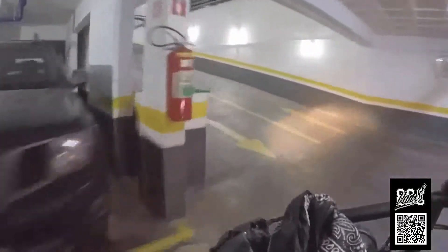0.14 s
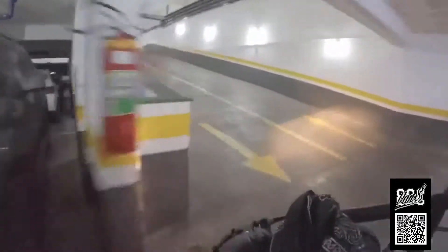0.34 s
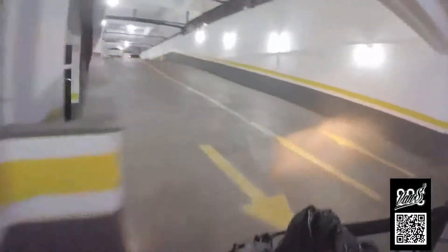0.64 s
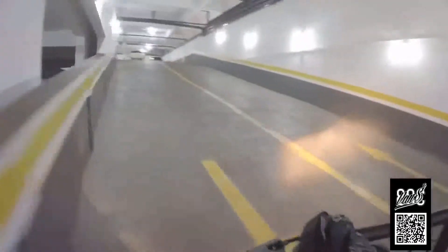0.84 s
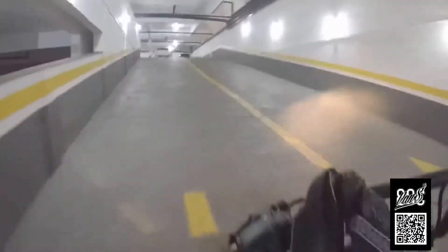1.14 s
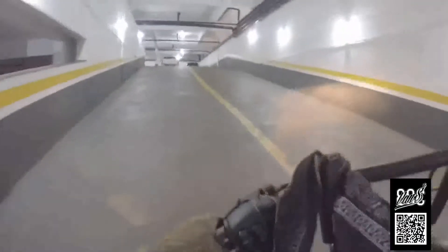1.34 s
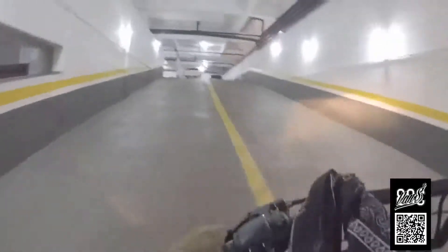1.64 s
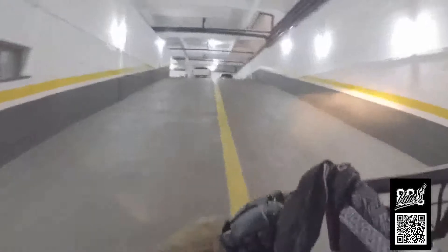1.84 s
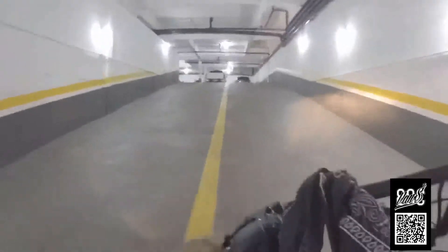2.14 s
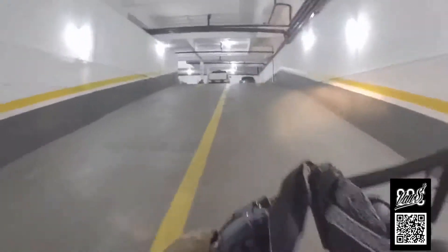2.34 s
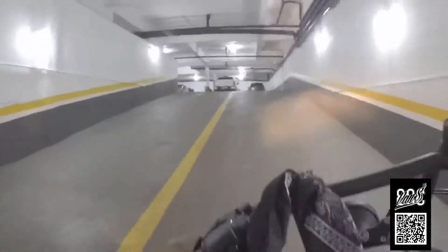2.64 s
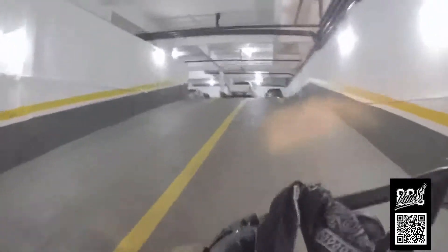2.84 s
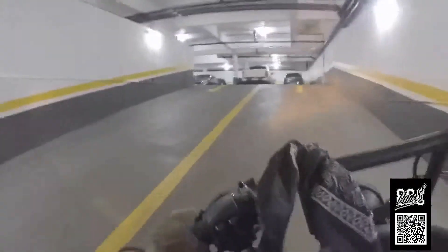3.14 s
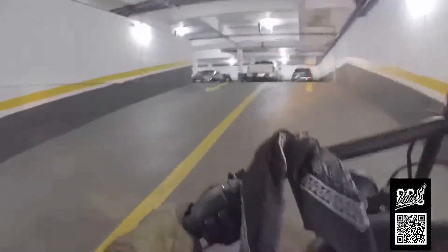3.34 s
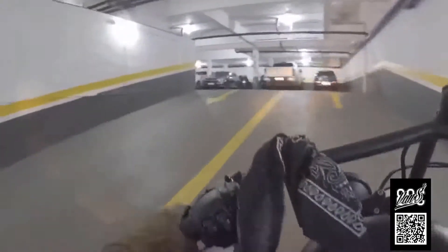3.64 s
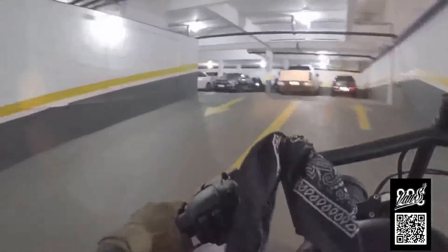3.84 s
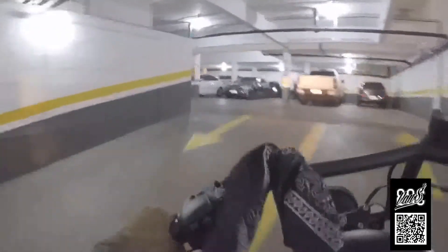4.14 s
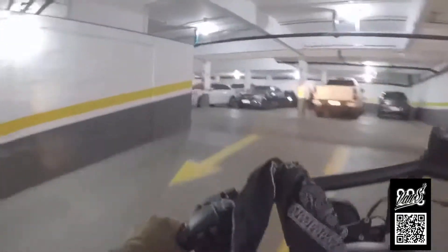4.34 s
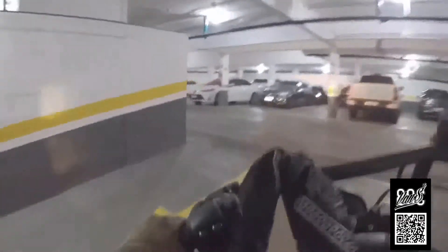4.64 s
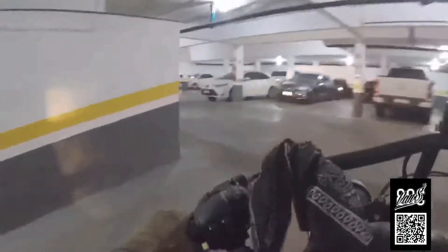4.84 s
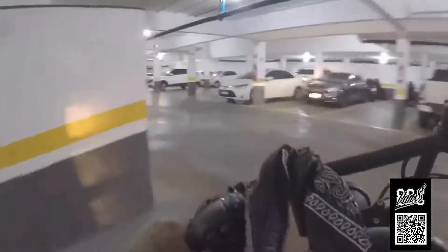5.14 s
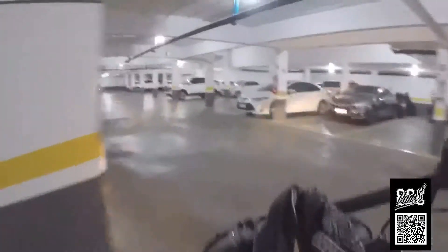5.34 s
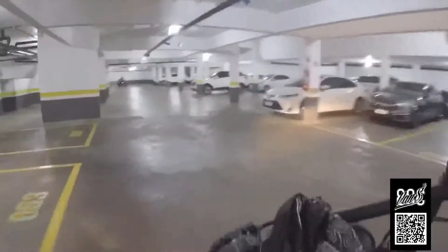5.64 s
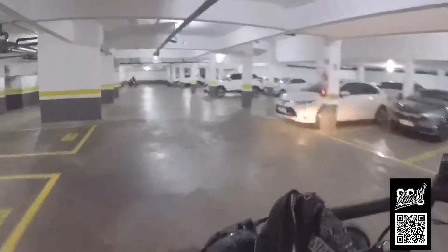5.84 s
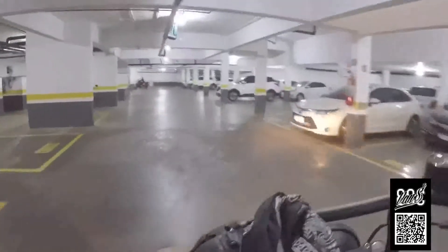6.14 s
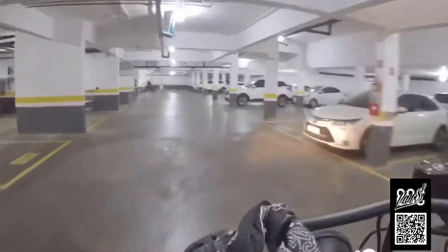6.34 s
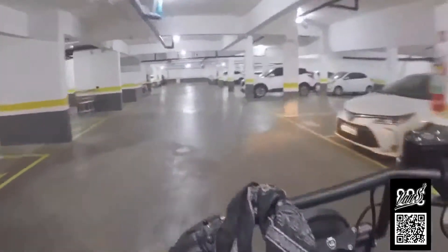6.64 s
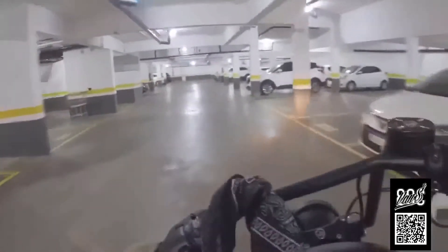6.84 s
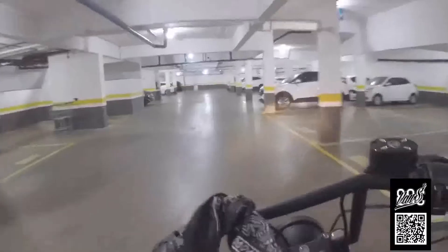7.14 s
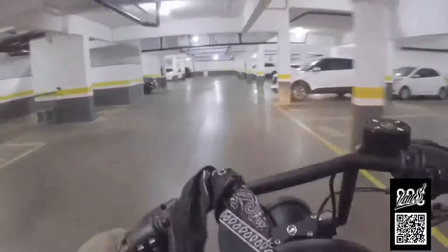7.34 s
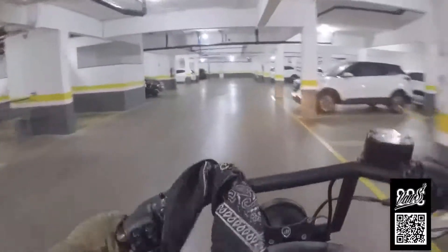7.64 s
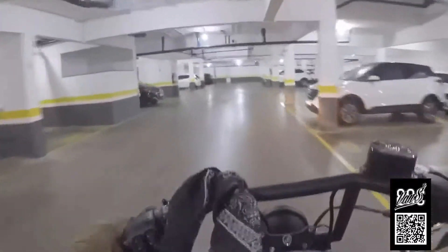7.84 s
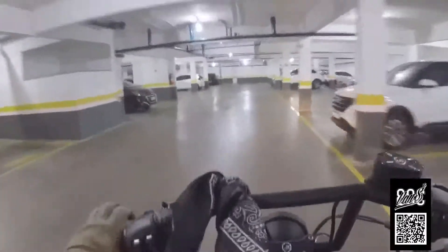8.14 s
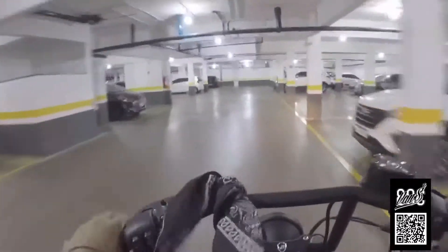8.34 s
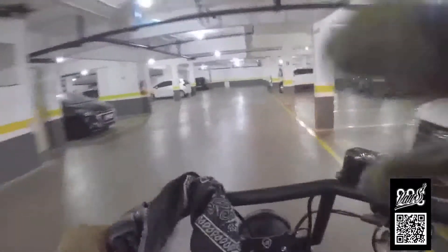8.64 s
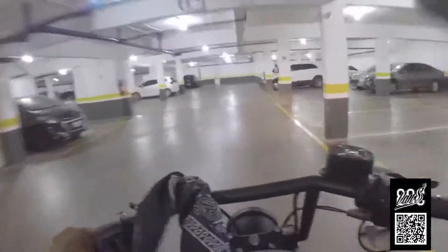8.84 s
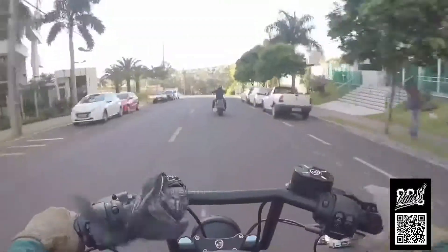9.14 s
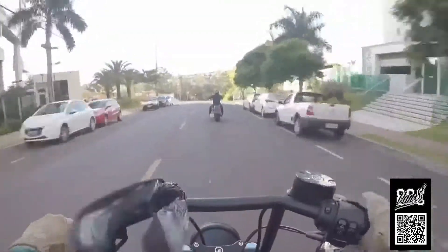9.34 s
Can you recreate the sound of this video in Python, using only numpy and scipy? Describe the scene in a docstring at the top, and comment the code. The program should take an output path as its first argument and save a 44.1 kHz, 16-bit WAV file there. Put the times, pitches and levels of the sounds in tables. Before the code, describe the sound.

A large V-twin motorcycle runs at low revs in a concrete underground garage, heard from the rider's seat. Its uneven, loping exhaust booms and barks with strong reverberation, over valve clatter and a light mechanical hiss. Around 1 second the revs sag and the engine thumps up a ramp, then pulls harder until about 3.6 seconds, ticking sharply around 2.5 to 3.5. The throttle eases from about 4 to 5.7 seconds, with a few hollow exhaust pops and faint metal squeaks. The revs dip lowest near 6 seconds, climb again through 7.5, and the throttle closes after 8. Scattered bright ticks and small knocks come from the bike throughout. Just before 9 seconds the sound fades out quickly and returns on an open street without echo: wind buffets the microphone over tyre rush, a lighter exhaust drone, a brief growl and a few small knocks, until about 9.5 seconds.

```python
"""V-twin motorcycle in a concrete garage

Heard from the rider's seat, the bike rolls up a ramp and through an underground garage. Uneven firing
pulses excite the exhaust resonances, which boom and bark; valve gear and drive tick and hiss, and the
hall reverberates. At nine seconds the sound fades out and returns on an open street, where wind buffets
the microphone over the rush of tyres and the drone of the exhaust."""
import sys
import numpy as np
from scipy import signal
from scipy.fft import rfft, irfft, next_fast_len
from scipy.io import wavfile
from scipy.ndimage import uniform_filter1d, minimum_filter1d

SR = 44100
rng = np.random.default_rng(int(sys.argv[2]) if len(sys.argv) > 2 else 0)


def dump(signal):
    """Clip the signal to [-1, 1] and save it as 16-bit WAV at the path in sys.argv[1]."""
    limited = np.clip(np.atleast_2d(signal).T, -1, 1)
    pcm = np.round(limited * 32767).astype(np.int16)
    wavfile.write(sys.argv[1], SR, pcm)


N = 418509

# Engine speed, in four-stroke cycles per second: t/s, f/Hz
CYCLE_RATE = [(0, 14.667), (0.45, 14.383), (0.9, 12.582), (1.2, 13.184), (1.45, 11.645), (1.95, 12.242),
              (2.4, 13.366), (3.0, 14.706), (3.6, 15.594), (3.9, 14.71), (4.25, 15.702), (4.65, 15.989),
              (5.35, 15.367), (5.75, 13.005), (6.15, 10.759), (6.5, 12.214), (6.95, 14.352), (7.5, 16.353),
              (8.2, 16.438), (8.6, 15.714), (8.95, 16.442), (9.2, 14.85)]
# Engine load relative to full load: t/s, level/dB
ENGINE_LOAD = [(0, -4.5), (0.6, -7), (1.55, -1.5), (2.5, -2.5), (3.55, -0.5), (4.3, -7), (5.7, -7.5),
               (6.6, -2.5), (7.5, -3.5), (8.15, -8.5), (8.45, -6.5), (8.85, -15), (8.95, -17)]
# Overall fader: t/s, gain
FADER_GAIN = [(0, 1), (8.86, 1), (8.97, .15), (8.978, 0), (9.018, 0), (9.026, 1)]
# Left microphone port relative to the right: f/Hz, level/dB
PORT_BALANCE = [(60, 4.5), (110, 3.5), (200, 2.5), (370, 1.5), (670, 2), (1240, -4.5), (2260, -2.5),
                (4140, -0.5), (7000, 2), (10000, -0.5), (14000, 0.5)]
# Correlation of the ports for equally strong centre and side signals: f/Hz, coefficient
PORT_CORRELATION = [(60, 0.99), (130, 0.82), (280, 1), (450, 0.79), (650, 0.41), (1000, -0.28),
                    (1400, 0.027), (2900, 0.39), (6400, 0.31), (12000, 0.59)]

# Spectral densities of the noisy layers: f/Hz, relative level/dB
DRAUGHT_SPECTRUM = [(12, -31), (26, 14), (40, 3), (60, -20), (120, -40)]
WIND_SPECTRUM = [(12, -25), (25, -32), (45, 3.5), (75, -2), (120, 1), (180, -5), (260, -12), (400, -25.5)]
TYRE_SPECTRUM = [(130, -47), (220, -1), (296, -3.5), (391, -2.5), (541, -8), (1110, -19), (1580, -27.5),
                 (2480, -25.5), (2900, -30.5), (9000, -54.5), (14000, -86)]
RASP_SPECTRUM = [(500, -12), (1100, 14), (1500, 3), (2300, 1), (3200, -14), (9000, -47)]
CLATTER_SPECTRUM = [(600, -33), (900, 0), (1100, -0.5), (1350, 2), (1600, -2), (2300, 0.5), (2600, -0.5),
                    (3400, 1), (4500, -1.5), (5600, -4), (8000, -25.5)]
HISS_SPECTRUM = [(3200, -42), (4600, -11.5), (5600, -6.5), (6300, -1.5), (7000, 0.5), (7700, -1),
                 (8400, -7), (10000, -11), (11300, -22.5), (13000, -22.5), (14500, -61)]
THUD_SPECTRUM = [(35, -29.5), (55, -13.5), (80, -2), (118, -1), (140, -1.5), (165, -3), (200, -2.5),
                 (240, -4), (310, -12.5), (380, -21.5), (600, -51)]
BARK_SPECTRUM = [(200, -47), (300, 3.5), (370, -5), (418, -1.5), (460, -5.5), (520, -4.5), (610, -7.5),
                 (700, -7.5), (850, -14), (1050, -28.5), (1600, -31.5)]
BRIGHT_TICK_SPECTRUM = [(1000, -37), (2500, -2), (7500, 21.0), (10000, 5.5), (14000, -9)]
TICK_SPECTRUM = [(800, -15.5), (1400, 4), (2400, -5), (3200, 2.0), (5000, -7.5), (8000, -3), (12000, -21)]

# Gusts in the garage and on the street (sigma is the Gaussian half length): t/s, sigma/s, rise/dB
DRAUGHT_GUSTS = [(1.85, 0.3, 5.8), (8.85, .18, 11)]
WIND_GUSTS = [(9.097, .01, 9.5), (9.164, 0.008, 8), (9.21, 0.014, 7), (9.238, .008, 5), (9.366, 0.0054, 8),
              (9.482, 0.014, 7)]
# Partials of the growl and of the exhaust in the open: harmonic number, relative level/dB
GROWL_HARMONICS = [(3, 0.5), (4, -7), (5, -11), (6, -20), (8, -17)]
DRONE_HARMONICS = [(5, -28), (7, -27), (9, -26)]

# Knocks of bike parts: t/s, f/Hz, level/dB
PART_KNOCKS = [(.422, 7500, -31), (3.091, 7500, -28), (4.596, 3000, -33), (4.744, 3000, -34),
               (5.938, 7500, -30), (6.544, 7500, -26), (8.399, 3000, -32), (8.523, 3400, -33),
               (8.549, 3000, -32), (8.616, 3000, -33), (8.652, 3400, -33), (9.174, 1120, -29),
               (9.287, 1030, -30), (9.463, 1110, -27.5)]
# Squeaks of metal parts: t/s, sigma/s, f/Hz, level/dB
METAL_SQUEAKS = [(.41, .025, 1510, -40.5), (0.682, .025, 2310, -42), (1.132, .035, 1900, -38),
                 (1.4, .04, 2350, -41), (4.63, .04, 1340, -42), (4.72, .04, 4220, -43),
                 (4.848, 0.023, 1350, -40), (4.961, 0.052, 3350, -39.5), (5.07, 0.04, 1370, -41),
                 (5.109, .025, 2340, -40), (5.22, 0.028, 4030, -42), (6.792, 0.054, 1338, -37),
                 (8.666, 0.014, 3210, -43), (8.66, .02, 3510, -45)]
# Short bright broadband ticks, and hard single firings: t/s, relative level/dB
BRIGHT_TICKS = [(2.5215, -2), (2.9108, -3.5), (3.2241, -20), (3.2614, -16), (3.6172, -11), (3.9476, -13),
                (4.083, -6), (4.215, -3), (4.596, -8), (4.722, -4.5), (4.8697, -6), (5.5099, -16),
                (6.545, -34), (6.991, -3.5), (7.662, -4.5), (7.877, -6), (8.271, -10)]
HARD_FIRINGS = [(.273, -31), (.412, -22), (.554, -18), (3.942, -21), (4.206, -18), (4.836, -18),
                (4.851, -26), (5.092, -13.5), (5.355, -29), (5.483, -18.5), (8.117, -22.5), (8.811, -21)]
# Spells of hard ticking and of thumping on the ramp: t/s, sigma/s, level/dB
TICKING_SPELLS = [(2.5, .1, -35), (3.08, .33, -30.5), (4.7, .15, -38), (7.65, .12, -38), (8.65, .15, -43)]
RAMP_SPELLS = [(1.0, 0.49, -21.5), (3.15, 0.47, -31)]

# Impulses within one engine cycle: phase/cycles, relative level/dB
TICK_PATTERN = [(.062, 0), (.642, -2.5)]
VALVE_PATTERN = [(.06, 6), (.11, 1), (.64, 5), (.69, 2.5)]
THUMP_PATTERN = [(.29, 0)]
THROB_PATTERN = [(.02, 0), (.522, -.5)]
FIRING_PATTERN = [(0.052, -4.5), (.556, -5)]

# Modes of metal parts, of the pipes and of the exhaust's boom: f/Hz, bandwidth/Hz, relative level/dB
METAL_RESONANCES = [(1320, 320, -7.5), (2274, 260, -11), (3190, 140, -14)]
PIPE_RESONANCES = [(174, 10, -6), (417.4, 12.8, 2), (531, 22, -8)]
BOOM_RESONANCES = [(121.1, 8.4, -22.5), (175.4, 4.5, -29)]
# Standing waves between the walls that the bike rides through: t/s, sigma/s, f/Hz, gain/dB
ROOM_MODES = [(0.2, 0.27, 116.2, -17), (0.2, .25, 174.6, -20), (1.2, .22, 155, -19),
              (1.448, 0.061, 112.6, -17), (2.253, 0.17, 157, -21.5), (3.0, 0.15, 191, -22.5),
              (1.995, 0.21, 63, -24), (2.43, 0.34, 93.8, -18), (3.048, 0.29, 147.2, -20),
              (3.496, 0.19, 122.8, -19.5), (3.5, 0.36, 168.7, -18), (4.393, 0.1, 172.4, -9.5),
              (4.8, 0.092, 175.8, -15.5), (4.5, .25, 80, -28), (4.906, 0.25, 111, -22),
              (5.197, 0.095, 124.7, -25), (5.502, 0.11, 115.4, -21), (5.745, 0.21, 117.6, -14),
              (6.1, 0.076, 111.5, -15), (6.622, 0.23, 117.8, -18), (7.65, 0.29, 80, -22),
              (6.797, 0.21, 97, -25), (7.15, 0.24, 122, -21), (7.395, 0.16, 114.3, -20.5),
              (7.804, 0.2, 180.8, -14), (8.163, 0.29, 129.7, -18), (8.496, 0.1, 175.3, -11)]
# Harmonics of the cycle rate: harmonic number, relative level at full load/dB, slope/(dB per dB of load)
ENGINE_ORDERS = [(5, -1, -0.3), (6, -20.5, -1.3), (7, 2.5, -0.13), (8, 3, 0), (9, -2, -0.5), (10, 5.5, .5),
                 (11, -5, 0), (12, 1, .5), (13, 2, 1), (14, -1, 0.5)]

CRUISE_RATE_HZ = 14.5
GARAGE_T60_S = 0.94
STREET_START_S, STREET_RISE_S, STREET_START_DB = 9.02, .1, -15


def from_db(db):
    """Amplitude ratio of a level in decibels."""
    return 10 ** (np.asarray(db) / 20)


def in_time(points):
    """Linear interpolation of a (t, value) table at every sample."""
    return np.interp(np.arange(N) / SR, *np.transpose(points))


def at_hz(points, hz):
    """Interpolation of an (f, value) table on a logarithmic frequency axis."""
    frequencies, values = np.transpose(points)
    return np.interp(np.log(hz + 1e-6), np.log(frequencies), values)


def swell(centre_s, sigma_s):
    """Gaussian envelope of height 1."""
    return np.exp(-.5 * ((np.arange(N) / SR - centre_s) / sigma_s) ** 2)


def spell_gain(spells):
    """Superposition of Gaussian envelopes, as an amplitude."""
    return sum(from_db(db) * swell(s, sigma_s) for s, sigma_s, db in spells)


def drift(rate_hz):
    """Low-pass random fluctuation with unit standard deviation."""
    pole = np.exp(-200 * np.pi * rate_hz / SR)
    slow = signal.lfilter([1], [1, -2 * pole, pole * pole], rng.standard_normal(N // 100 + 2002))[2000:]
    return np.interp(np.arange(N) / 100, np.arange(len(slow)), slow / slow.std())


def band_pass(x, hz, width_hz, stages=1):
    """Cascade of identical second-order resonators."""
    b, a = signal.iirpeak(hz, hz / width_hz, SR)
    for _ in range(stages):
        x = signal.lfilter(b, a, x + 1e-18)
    return x


def resonance(tones, hz, width_hz, db):
    """Forced oscillation: a mode builds up while a tone crosses it, then decays at its own frequency."""
    radius = np.exp(-np.pi * width_hz / SR)
    return signal.lfilter([from_db(db) * (1 - radius)], [1, -radius * np.exp(2j * np.pi * hz / SR)], tones)


def coloured(pair, spectrum):
    """Minimum-phase filtering to a spectrum, falling 20 dB per octave above its last point."""
    hz = np.arange(2049) * SR / 4096
    octaves_above = np.log2(np.maximum(hz / spectrum[-1][0], 1))
    cepstrum = irfft(np.log(from_db(at_hz(spectrum, hz) - 20 * octaves_above)))
    cepstrum[1:2048] *= 2   # folding the cepstrum makes the response causal
    cepstrum[2049:] = 0
    response = irfft(np.exp(rfft(cepstrum)))
    return signal.oaconvolve(pair, response[None], axes=1)[:, :N]


def levelled(pair, spectrum, level_db, size=5000):
    """Filters a centre/side pair and holds the running RMS of its centre to a level curve."""
    pair = coloured(pair, spectrum)
    power = uniform_filter1d(uniform_filter1d(pair[0] ** 2, size), size)
    return pair * from_db(level_db) / np.sqrt(np.abs(power) + 1e-18)


def wavering(pair, depth_db, size=1024):
    """Random amplitude modulation, band by band, makes the timbre flicker."""
    spectra = signal.stft(pair, nperseg=size)[2]
    patches = rng.standard_normal(spectra.shape[1:])
    patches = uniform_filter1d(uniform_filter1d(patches, size=12, axis=0), size=7, axis=1)
    return signal.istft(spectra * from_db(depth_db * patches / patches.std()), nperseg=size)[1][:, :N]


def impulses(events):
    """One impulse for each (t, level) row."""
    clicks = np.zeros(N)
    for s, db in events:
        clicks[int(s * SR)] = from_db(db)
    return clicks


def pulse_train(cycles, pattern, scatter_db, jitter_s):
    """Quasi-periodic impulses: the pattern repeats in each engine cycle with random deviations."""
    clicks, turns = np.zeros(N), np.arange(int(cycles[-1]))
    for phase, db in pattern:
        timing, strength = rng.standard_normal((200, 2))[:len(turns)].T
        at = np.searchsorted(cycles, turns + phase) + (timing * jitter_s * SR).astype(int)
        clicks[np.clip(at, 0, N - 1)] += from_db(db + scatter_db * strength)
    return clicks


def bursts(clicks, decay_s):
    """Each impulse releases exponentially decaying noise of the same mean energy."""
    pole = np.exp(-1 / (decay_s * SR))
    envelope = signal.lfilter([np.sqrt(1 - pole * pole)], [1, -pole], clicks + 1e-18)
    return envelope * rng.standard_normal(N)


def at_ports(pair):
    """Sum and difference turn centre/side into left/right: coherent in the bass, less so in the treble."""
    size = next_fast_len(N)
    hz = np.arange(size // 2 + 1) * SR / size
    correlation = np.clip(at_hz(PORT_CORRELATION, hz), -.9, .999)
    centre, side = rfft(pair, size)
    side = side * np.sqrt((1 - correlation) / (1 + correlation))
    signs = np.array([[1], [-1]])
    balance = from_db(signs * at_hz(PORT_BALANCE, hz) / 2)
    return irfft(balance * (centre + signs * side), size)[:, :N]


def garage(x, wet_db, change_hz=0.4414):
    """Direct sound plus a diffuse reverberant field that changes as the bike moves; centre/side."""
    t = np.arange(SR) / SR
    tails = rng.standard_normal((4, SR)) * from_db(-60 * t / GARAGE_T60_S) * (t > .008)
    tails /= np.linalg.norm(tails, axis=1, keepdims=True)
    ringing = np.concatenate([x[:SR], x])   # the hall is already ringing at the start
    echoes = signal.fftconvolve(ringing[None], tails, axes=1)[:, SR:SR + N]
    travel = 2 * np.pi * change_hz * np.arange(N) / SR
    front, side = np.cos(travel) * echoes[:2] + np.sin(travel) * echoes[2:]
    wet = from_db(wet_db)
    return np.array([(x + wet * front) / np.hypot(1, wet), side])


def moving_air(spectrum, level_db, gusts=(), size=3000):
    """Turbulent pressure fluctuations: coloured noise whose level rises in any gusts."""
    rise_db = sum(db * swell(s, sigma_s) for s, sigma_s, db in gusts)
    return levelled(rng.standard_normal((2, N)), spectrum, level_db + rise_db, size)


def tyre_rush(cycles):
    """Broadband rolling noise, mixed with bursts at the firing rate, crests slightly and settles."""
    firings = pulse_train(cycles, FIRING_PATTERN, scatter_db=3.0, jitter_s=0.00031)
    beat = bursts(firings / firings.std(), decay_s=0.0049)
    level_db = -28 + 2 * swell(9.17, 0.077)
    return levelled(rng.standard_normal((2, N)) + 0.5 * beat, TYRE_SPECTRUM, level_db, size=2000)


def growl(crest_s=9.233, crest_hz=103, first_octave_s=.095, rough_db=3.5):
    """A harmonic series, roughened by random modulation, arches briefly in pitch."""
    octaves_down = np.minimum(((np.arange(N) / SR - crest_s) / first_octave_s) ** 2, 2)
    turns = np.cumsum(crest_hz * 2 ** -octaves_down) / SR
    stack = 0
    for harmonic, db in GROWL_HARMONICS:
        amplitude = from_db(db + rough_db * drift(40))
        stack += amplitude * np.cos(2 * np.pi * (harmonic * turns + rng.random()) + .25 * drift(30))
    return from_db(-19.5) * swell(crest_s, .047) * stack


def street(cycles):
    """Free field, in mono: wind, tyres, a brief rasp, the exhaust's drone and a growl, without echo."""
    tyres = tyre_rush(cycles)
    wind = moving_air(WIND_SPECTRUM, level_db=-18, gusts=WIND_GUSTS, size=900)
    rasp = moving_air(RASP_SPECTRUM, level_db=-32) * swell(9.125, 0.051)
    drone = sum(from_db(db) * np.cos(2 * np.pi * (k * cycles + rng.random())) for k, db in DRONE_HARMONICS)
    return (wind + tyres + rasp)[0] + drone + growl()


def knocks(attack_s=.002, decay_s=0.006, q=3.0):
    """Heavily damped vibration: a struck part gives a dry burst around its natural frequency."""
    out, t = np.zeros(N + SR), np.arange(SR // 10) / SR
    envelope = (1 - np.exp(-t / attack_s)) * np.exp(-t / decay_s)
    for s, hz, db in PART_KNOCKS:
        ring = band_pass(rng.standard_normal(SR), hz, hz / q, stages=2)[-len(t):]
        ring /= np.sqrt(np.average(ring ** 2, weights=envelope ** 2))
        out[int(s * SR) + np.arange(len(t))] += from_db(db) * envelope / envelope.max() * ring
    return out[:N]


def squeaks(width_hz=45):
    """Narrow-band noise: a metal part sounds briefly as a rough tone."""
    out = np.zeros((2, N))
    for s, sigma_s, hz, db in METAL_SQUEAKS:
        at = np.arange(int((s - .2) * SR), int((s + .2) * SR))
        ring = band_pass(rng.standard_normal((2, SR)), hz, width_hz, stages=2)[:, -len(at):]
        envelope = swell(s, sigma_s)[at]
        ring /= np.sqrt(np.average(ring[0] ** 2, weights=envelope ** 2))
        out[:, at] += from_db(db) * envelope * ring
    return out


def singing_metal(load_db):
    """Random forcing: vibration keeps narrow modes of metal parts faintly ringing."""
    out = 0
    for hz, width_hz, db in METAL_RESONANCES:
        ring = band_pass(rng.standard_normal((2, N)), hz, width_hz, stages=2)
        out += from_db(db + 3.5 * drift(13)) * ring / ring.std()
    return out * from_db(-42 + 0.25 * load_db)


def bright_ticks(trim_db=-10.5):
    """Broadband transients: short noise bursts, weighted to the treble, are heard as bright ticks."""
    clicks = impulses(BRIGHT_TICKS)
    ticks = garage(bursts(clicks, decay_s=0.01), wet_db=0.5)
    pair = coloured(wavering(ticks, depth_db=-1.5), BRIGHT_TICK_SPECTRUM)
    return pair / np.abs(pair[0]).max() * clicks.max() * from_db(trim_db)


def ticking(cycles):
    """Periodic transients: in spells the engine ticks hard, once for each cylinder."""
    clicks = pulse_train(cycles, TICK_PATTERN, scatter_db=0.9, jitter_s=.0003)
    pair = coloured(garage(bursts(clicks, decay_s=.006), wet_db=-5), TICK_SPECTRUM)
    return pair / pair[0].std() * spell_gain(TICKING_SPELLS)


def valves_and_drive(cycles, rate_hz, load_db):
    """Valve impacts over continuous gear noise: the casing radiates clatter, small parts a hiss."""
    taps = pulse_train(cycles, VALVE_PATTERN, scatter_db=0.0, jitter_s=.0005)
    landing_db = 1.52 * load_db + 1.5 * (rate_hz - CRUISE_RATE_HZ)   # harder with load and speed
    taps = taps / taps.std() * from_db(landing_db)
    clatter = garage(bursts(taps, decay_s=0.0076), wet_db=0.5) + 0.91 * rng.standard_normal((2, N))
    rush = rng.standard_normal((2, N)) * from_db(2.64 * drift(14.8))
    hiss = garage(bursts(taps, decay_s=0.0066), wet_db=6.0) + 3.4 * rush
    clatter, hiss = wavering(clatter, depth_db=1.73), wavering(hiss, depth_db=3.0)
    tick_gain = spell_gain(TICKING_SPELLS)
    clatter_db = -27 + 0.85 * load_db - 2 * tick_gain / tick_gain.max()   # gives way to hard ticking
    hiss_db = -26 + 1.21 * load_db
    return levelled(clatter, CLATTER_SPECTRUM, clatter_db) + levelled(hiss, HISS_SPECTRUM, hiss_db)


def ramp_thump(cycles):
    """A damped low resonance, struck once a cycle, thumps between the close walls of the ramp."""
    clicks = pulse_train(cycles, THUMP_PATTERN, scatter_db=1.6, jitter_s=0.00028)
    thumps = band_pass(clicks, hz=229, width_hz=120, stages=2)
    return garage(thumps / thumps.std() * spell_gain(RAMP_SPELLS), wet_db=-10)


def hollow_note(gas):
    """Transient response: the exhaust answers a pulse with a short hollow note."""
    return band_pass(gas, hz=498, width_hz=170, stages=4)


def pops():
    """Impulse excitation: single hard firings make the exhaust pop above the rest."""
    clicks = impulses(HARD_FIRINGS)
    notes = hollow_note(clicks)
    return garage(notes / np.abs(notes).max() * clicks.max(), wet_db=-17)


def throb(cycles, rate_hz, load_db):
    """Direct sound dominates near the rider: one hollow note per firing, loudest when the engine lugs."""
    firings = pulse_train(cycles, THROB_PATTERN, scatter_db=0.0, jitter_s=0.0003)
    notes = hollow_note(firings + 0.16 * bursts(firings, decay_s=0.0058))
    second_cylinder = 1 - np.cos(2 * np.pi * (cycles - FIRING_PATTERN[0][0]))
    lope = np.clip(1 + .045 * load_db * second_cylinder, 0, 1)   # it weakens off the throttle
    level_db = -28 + 0.68 * load_db - (rate_hz - CRUISE_RATE_HZ)
    return garage(lope * notes / notes.std() * from_db(level_db), wet_db=-11.5) * [[1], [.6]]


def boom(cycles, load_db, wander_db=1.12, between_modes_db=-30, room_width_hz=4.2):
    """Resonance: harmonics glide with engine speed and swell on crossing exhaust and room modes."""
    tones = 0
    for order, order_db, load_slope in ENGINE_ORDERS:
        phase = 2 * np.pi * (order * cycles + rng.random()) + .16 * drift(4)
        unrest_db = np.minimum(.5 - .15 * load_db, 1.6) * drift(8)   # greater off the throttle
        level_db = order_db + load_slope * load_db + unrest_db + wander_db * drift(1)
        tones += from_db(level_db) * np.exp(1j * phase)
    out = from_db(between_modes_db) * tones + sum(resonance(tones, *mode) for mode in BOOM_RESONANCES)
    for s, sigma_s, hz, db in ROOM_MODES:
        out += swell(s, sigma_s) * resonance(tones, hz, room_width_hz, db)
    return np.sqrt(2) * np.array([out.real, .5 * out.imag])


def pipes(gas):
    """Superposition of the gas pulses and the pipe modes that they excite."""
    return gas + sum(from_db(db) * band_pass(gas, hz, width_hz) for hz, width_hz, db in PIPE_RESONANCES)


def exhaust(cycles, load_db):
    """Source and filter: pressure pulses with turbulent tails drive the pipes to a thud and a bark."""
    firings = pulse_train(cycles, FIRING_PATTERN, scatter_db=1.5, jitter_s=0.00033)
    turbulence = bursts(firings, decay_s=0.011)
    thud = garage(pipes(firings + turbulence), wet_db=14.0)   # the lows are mostly reverberation
    bark = garage(pipes(firings + 1.1 * turbulence), wet_db=5.0 - 0.39 * load_db, change_hz=.9)
    thud_db, bark_db = -18.5 - 0.28 * load_db, -23.5 + 0.37 * load_db
    return levelled(thud, THUD_SPECTRUM, thud_db) + levelled(bark, BARK_SPECTRUM, bark_db)


def scene():
    """Superposition of the sources, first in the reverberant garage, then on the open street."""
    t = np.arange(N) / SR
    rate_hz, load_db = in_time(CYCLE_RATE), in_time(ENGINE_LOAD)
    cycles = np.cumsum(rate_hz) / SR
    bike = boom(cycles, load_db) + exhaust(cycles, load_db) + throb(cycles, rate_hz, load_db)
    bike += pops() + ramp_thump(cycles) + valves_and_drive(cycles, rate_hz, load_db)
    bike += singing_metal(load_db) + ticking(cycles) + squeaks() + bright_ticks()
    draught = moving_air(DRAUGHT_SPECTRUM, level_db=-40, gusts=DRAUGHT_GUSTS)
    inside = at_ports(bike + draught)
    fade_in = from_db(STREET_START_DB * np.clip(1 - (t - STREET_START_S) / STREET_RISE_S, 0, 1))
    return np.where(t < 9, inside, fade_in * street(cycles)) + knocks()


def record(dry, ceiling=0.8, size=500, cutoff_hz=14300):
    """Peak limiting, a fade to silence between the two places, and low-pass filtering."""
    allowed_gain = np.minimum(1, ceiling / (np.abs(dry).max(0) + 1e-9))
    limiter_gain = uniform_filter1d(minimum_filter1d(allowed_gain, size), size)
    low_pass = signal.ellip(10, .1, 80, cutoff_hz, fs=SR, output="sos")
    return signal.sosfilt(low_pass, dry * limiter_gain * in_time(FADER_GAIN))


dry = scene()
out = record(dry)
dump(out)
```